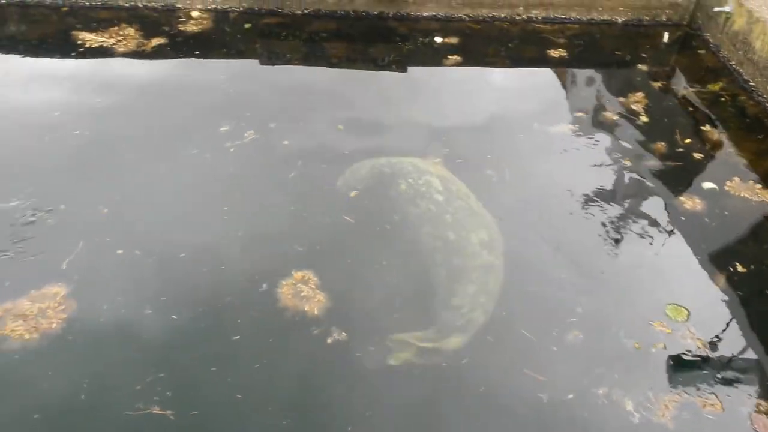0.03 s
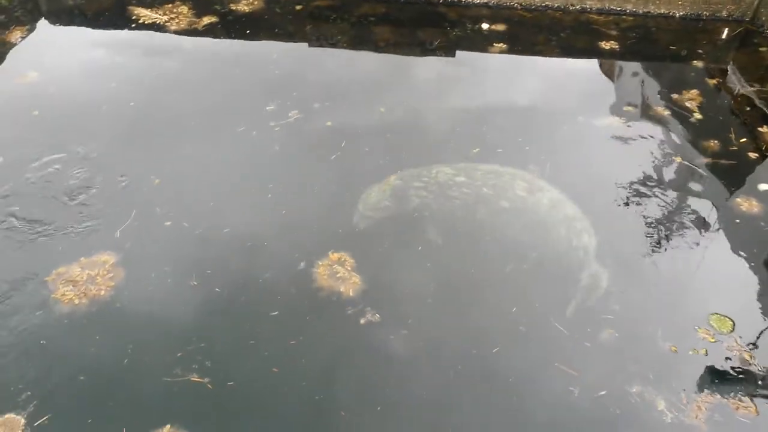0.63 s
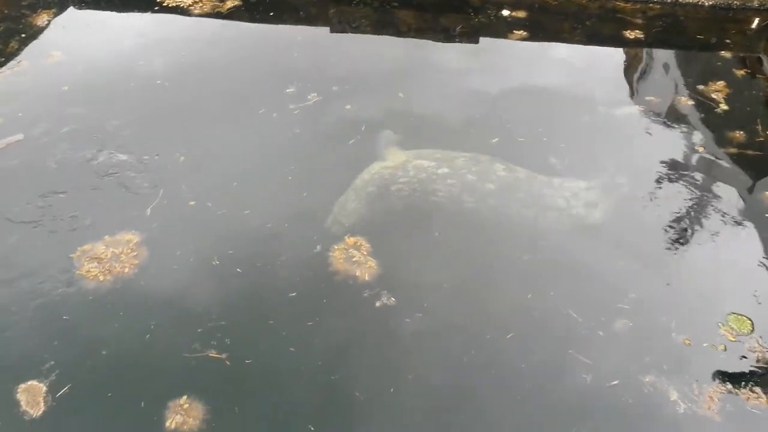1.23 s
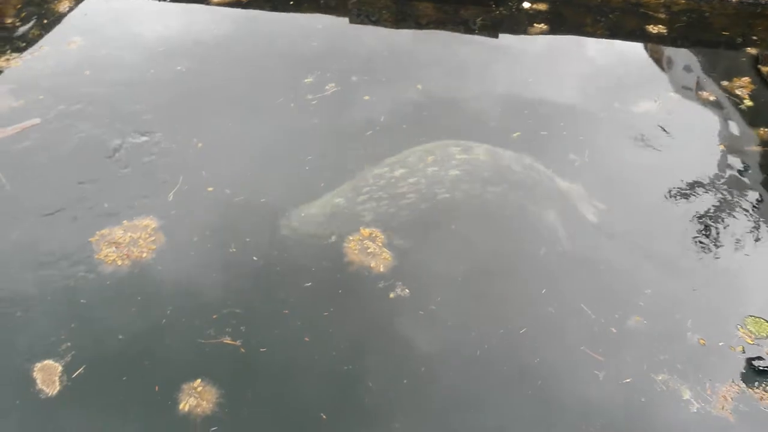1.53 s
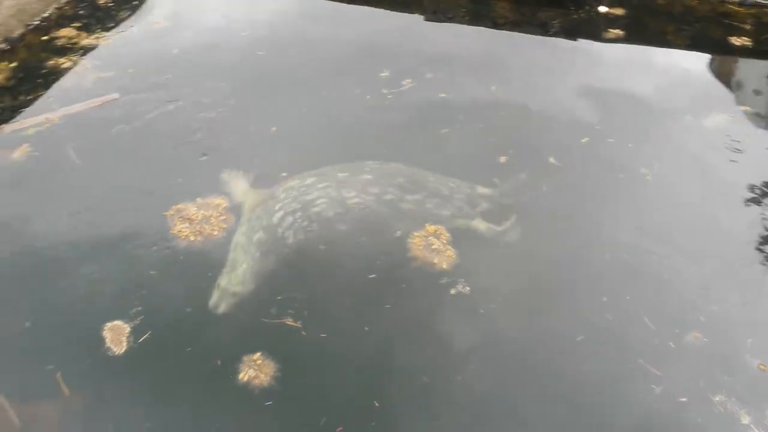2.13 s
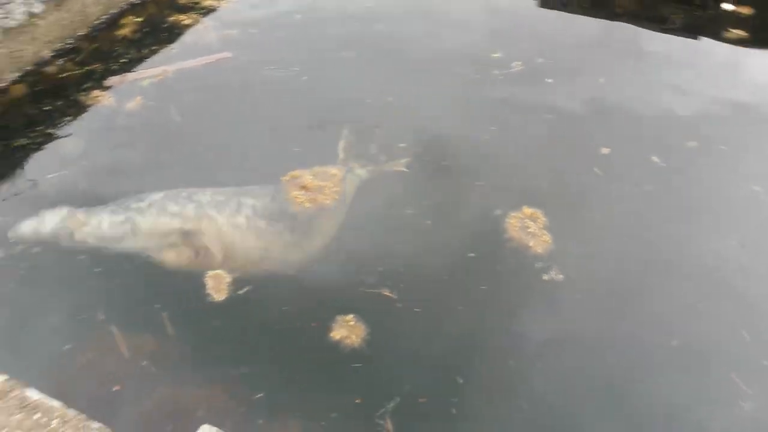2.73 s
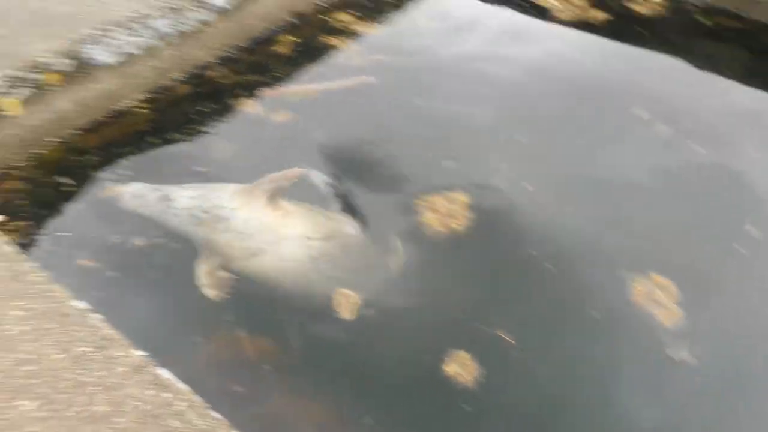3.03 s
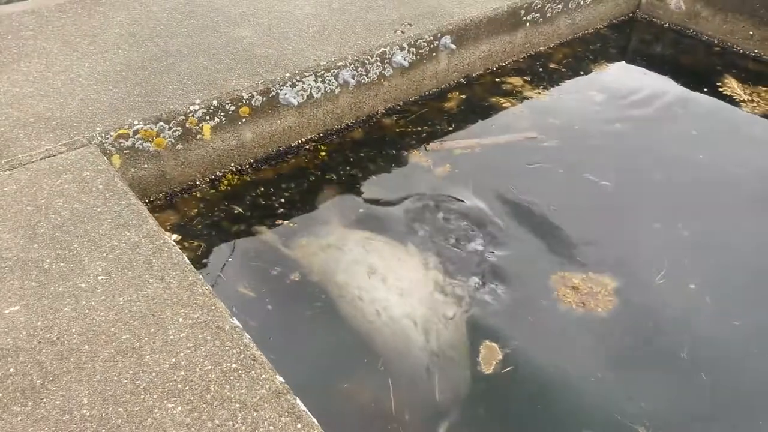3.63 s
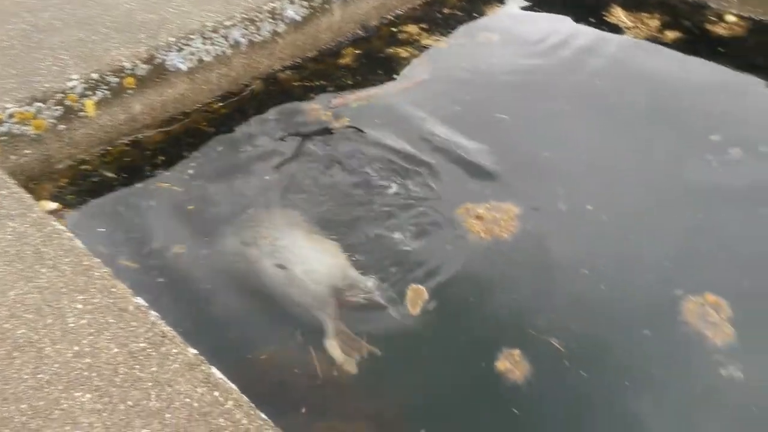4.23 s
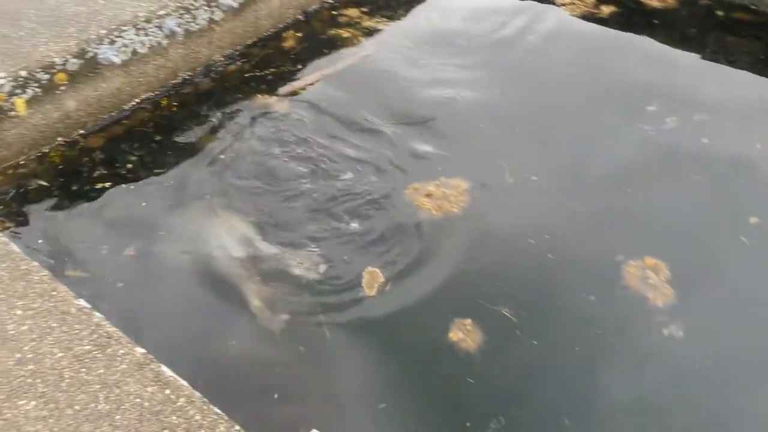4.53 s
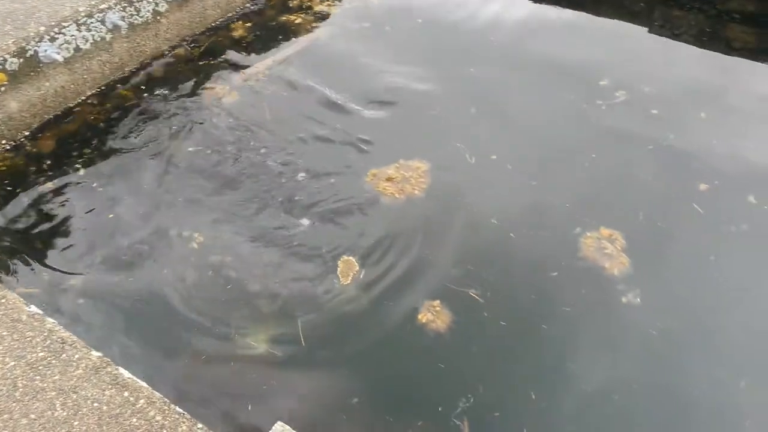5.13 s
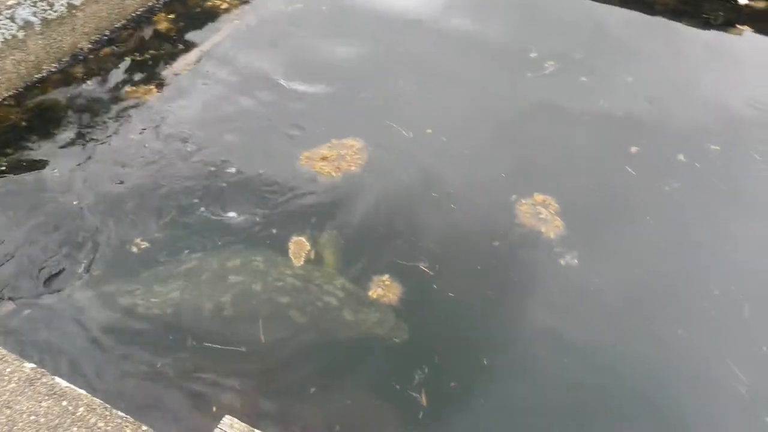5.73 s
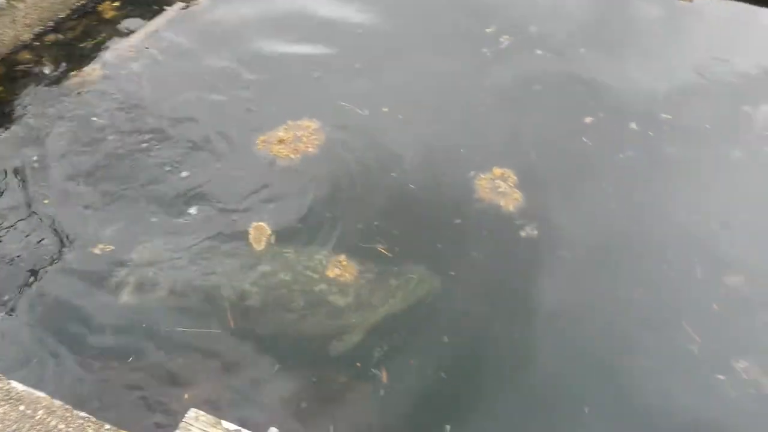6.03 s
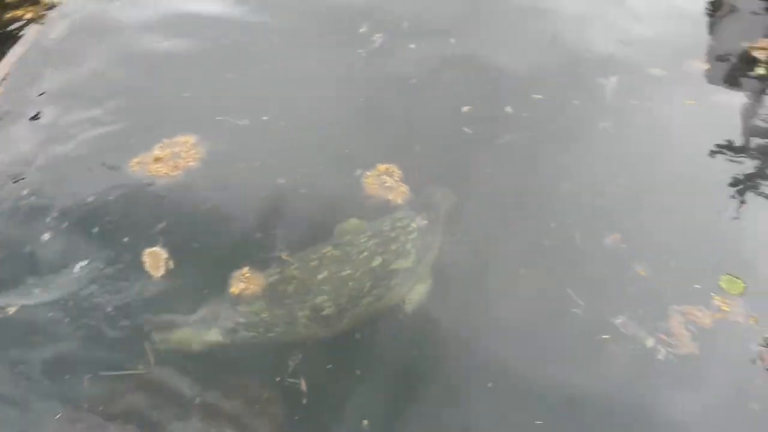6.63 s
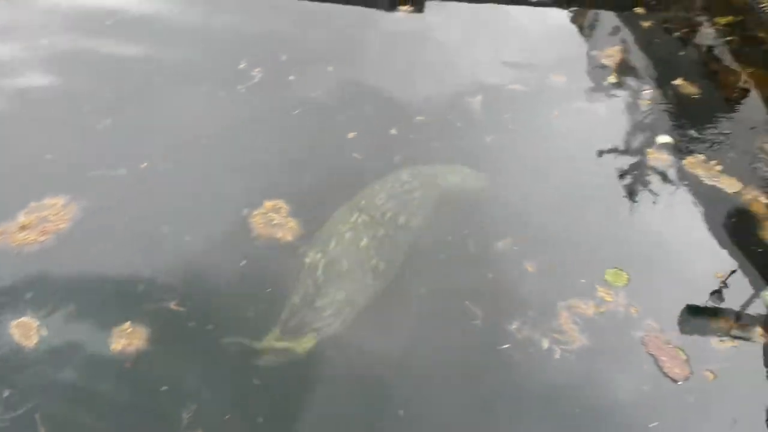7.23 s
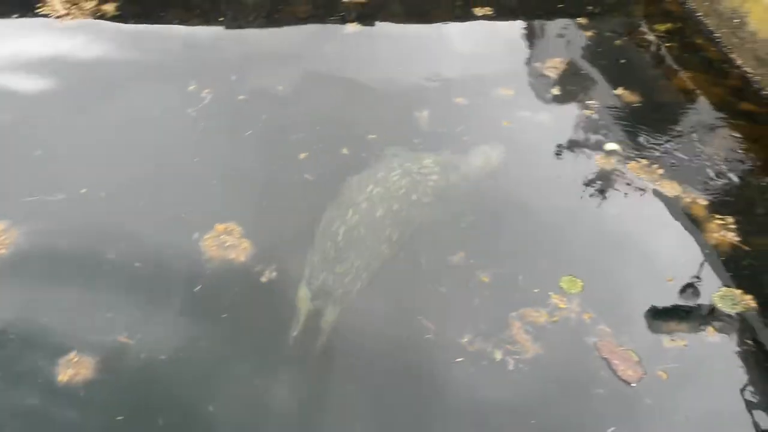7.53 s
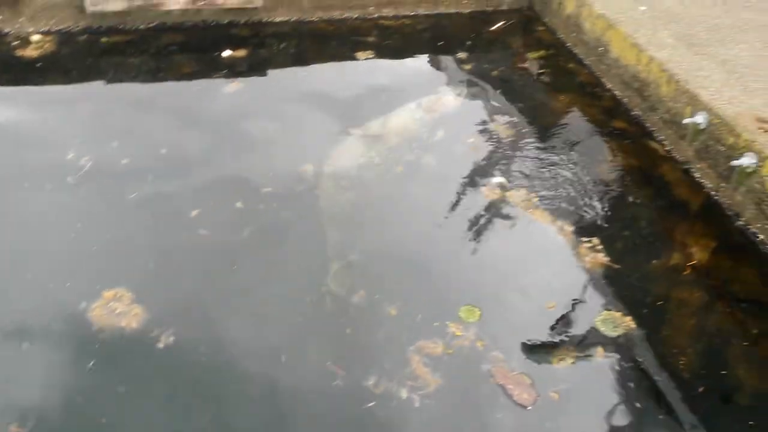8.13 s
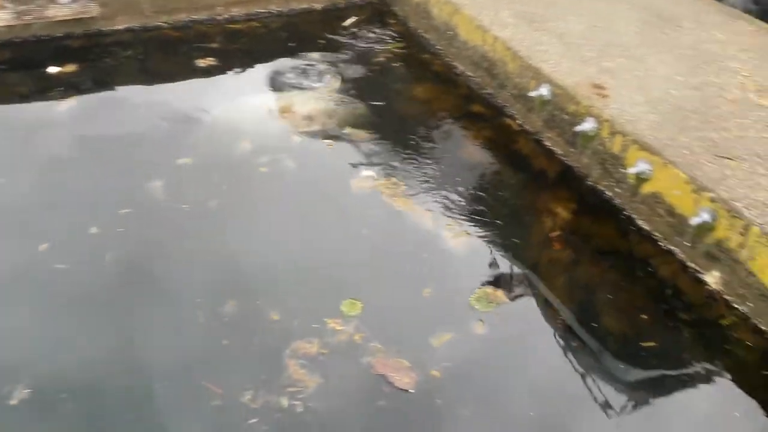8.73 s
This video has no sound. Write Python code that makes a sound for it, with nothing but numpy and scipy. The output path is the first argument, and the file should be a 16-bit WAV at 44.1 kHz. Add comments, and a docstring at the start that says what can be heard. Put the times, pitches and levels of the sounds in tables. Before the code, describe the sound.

At a concrete harbour pool, a low, pulsing rumble of two diesel engines runs steadily, slightly to the right. Beneath it a seal stirs the water, then rolls at the surface with a brief gurgle, light splashes and plinking drops, and swirls again toward the end. Close to the hand-held microphone are small irregular ticks, a faint high hiss and whine, and occasional soft bumps.

```python
"""A concrete harbour pool: a seal rolls at the surface, stirring up bubbles, slaps and drips,
and the walls echo them. Two diesel engines drone nearby at almost the same speed, so their
low orders beat over a diffuse machine wash. A hand-held camera adds a few knocks, a thin whine
and the fizz and spring pings of its lens stabiliser."""
import sys
import numpy as np
from scipy import signal
from scipy.fft import rfft, irfft, next_fast_len
from scipy.io import wavfile
from scipy.ndimage import uniform_filter1d, map_coordinates

SR = 44100
rng = np.random.default_rng(int(sys.argv[2]) if len(sys.argv) > 2 else 0)


def to_wav(s):
    """Save 16-bit WAV."""
    ch = np.atleast_2d(s).T  # columns
    pcm = np.round(np.clip(ch, -1, 1) * 32767)  # PCM
    wavfile.write(sys.argv[1], SR, pcm.astype(np.int16))


N = 392049
TIME_S = np.arange(N) / SR


def amp(db):
    """Decibels to gain."""
    return 10 ** (np.asarray(db) / 20)


def unit(x):
    """x at rms 1."""
    return x / np.sqrt(np.mean(x ** 2) + 1e-20)


def along(points, hz):
    """Interpolate (freq_hz, value) rows on a log axis."""
    freq_hz, values = np.transpose(points)
    return np.interp(np.log(hz + 1), np.log(freq_hz + 1), values)


def curve(points):
    """Interpolate (time_s, value) rows at every sample."""
    return np.interp(TIME_S, *np.transpose(points))


def wobble(rate_hz):
    """Smooth random curve, rate_hz knots a second."""
    knots = rng.standard_normal(int(N * rate_hz / SR) + 4)
    return map_coordinates(knots, [TIME_S * rate_hz], order=2)


def filtered(x, response):
    """x through a frequency response."""
    size = next_fast_len(N + SR // 2)
    return irfft(rfft(x, size) * response(np.fft.rfftfreq(size, 1 / SR)), size)[..., :N]


def noise(spectrum):
    """Noise from (freq_hz, density_db) rows."""
    return filtered(rng.standard_normal(N), lambda hz: amp(along(spectrum, hz)) * np.sqrt(SR / 2))


def band(x, centre_hz, width_hz):
    """x twice through one resonance."""
    b, a = signal.iirpeak(min(centre_hz, SR / 4), centre_hz / width_hz, SR)
    return signal.lfilter(b, a, signal.lfilter(b, a, x))


def tone(turns, rms_db):
    """Sine from a phase in turns."""
    return np.sqrt(2) * amp(rms_db) * np.sin(2 * np.pi * turns)


def add(track, start_s, sound):
    """Mix a sound into the track."""
    part = track[..., max(round(start_s * SR), 0):][..., :sound.shape[-1]]
    part += sound[..., :part.shape[-1]]


def to_right(x, lead_db):
    """Pan right, keeping the mean of both sides."""
    gains = amp([[-lead_db / 2], [lead_db / 2]])
    return x * gains / gains.mean()


# Camera's turn toward the near wall: time_s, share
WALL_FACING = [(0, 0.18), (2.2, 0.17), (2.75, 0.33), (3.15, 0.66), (3.9, 0.66), (4.6, .66), (5.3, 0.53),
               (5.9, 0.43), (6.5, 0.17), (8.89, 0.25)]
# Machine wash: freq_hz, density_db
AIR_SPECTRUM = [(300, -86), (700, -85), (1100, -82.5), (1400, -88), (1800, -87.5), (2500, -92), (3300, -94),
                (4500, -96), (7000, -99), (14000, -103)]

def harbour_air():
    """Diffuse machine wash; a soft whistle grows when facing the wall."""
    wash = np.array([noise(AIR_SPECTRUM), noise(AIR_SPECTRUM)]) * amp(wobble(3.11))
    whistle = unit(band(rng.standard_normal((2, N)), centre_hz=2120, width_hz=250))
    return wash + amp(-66 + 11.8 * curve(WALL_FACING)) * whistle


# Exhausts in step: crest_s, level_db
THROB_CRESTS = [(0, -30.5), (.44, -29), (1.15, -31), (1.92, -27.5), (2.6, -31), (3.34, -27.5), (4.2, -30),
                (4.78, -29), (5.42, -29.5), (6.22, -33), (6.88, -29), (7.55, -29.5), (8.2, -29.5),
                (8.78, -29)]

def exhaust_throb(cycles, order=8, first_share=0.39):
    """Both exhausts at the firing order; the second gains one firing per swell."""
    firing = order * cycles + rng.random()
    gained = np.interp(TIME_S, np.transpose(THROB_CRESTS)[0], np.arange(len(THROB_CRESTS)))
    level_db = curve(THROB_CRESTS)
    return first_share * tone(firing, level_db) + (1 - first_share) * tone(firing + gained, level_db)


CYCLE_HZ = (14.911, 15.0855)  # four-stroke cycle rate of each engine
# Orders both engines sound: order, first_db, second_db, in_step_s
BEAT_ORDERS = [(4, -48, -37, 0.67), (7, -39.5, -46, 0.12)]
# First engine's 12th order: time_s, level_db
BOOM_LEVEL = [(0, -42.5), (2.6, -44), (3.8, -49), (5.2, -43), (6.3, -44), (7.3, -42.5), (8.05, -40),
              (8.89, -41)]

def beating_orders(cycles, sway_db=1.3):
    """Shared orders swell and sink as the second shaft slips ahead of the first."""
    def second(in_step_s):
        return cycles + (CYCLE_HZ[1] - CYCLE_HZ[0]) * (TIME_S - in_step_s)

    boom_db = curve(BOOM_LEVEL)
    out = tone(12 * cycles, boom_db) + 0.35 * tone(12 * second(in_step_s=0.34), boom_db)
    for order, first_db, second_db, in_step_s in BEAT_ORDERS:
        phase = rng.random()
        pair = tone(order * cycles + phase, first_db) + tone(order * second(in_step_s) + phase, second_db)
        out += pair * amp(sway_db * wobble(4))
    return out


# First engine's steady orders: order, level_db
HUM_ORDERS = [(9, -54), (11, -54), (14, -54), (16, -61.5), (17, -62), (18, -58), (20, -52), (23, -55),
              (28, -58.5), (108, -89), (112, -76), (116, -69), (125, -84), (133, -91), (136, -85.5),
              (140, -71.5)]
# Exhaust rumble: freq_hz, density_db
RUMBLE_SPECTRUM = [(15, -79), (30, -83), (45, -69.5), (80, -62), (115, -53), (150, -60.5), (195, -60),
                   (230, -66.5), (320, -67.5), (450, -79.5), (800, -79), (1300, -106.5), (3000, -115)]

def engine_hum(cycles):
    """Orders over exhaust rumble; the resonant 24th and the low mids sink when facing the wall."""
    facing = curve(WALL_FACING)
    drone = tone(24 * cycles, -37.5 - 10 * facing)
    hum = sum(tone(order * cycles + rng.random(), db + 2 * wobble(3.014)) for order, db in HUM_ORDERS)
    hum += noise(RUMBLE_SPECTRUM) * amp(1.55 * wobble(8.4))
    low_mids = filtered(hum, lambda hz: np.exp(-((hz - 240) / 125) ** 2))
    shade_db = -2.5 * (facing - facing.mean())
    return drone + hum + low_mids * (amp(shade_db) - 1)


def engines(speed_drift=0.00038):
    """Two slightly unsteady diesels, standing to the right, so that side leads in phase."""
    cycles = np.cumsum(CYCLE_HZ[0] * (1 + speed_drift * wobble(2.042))) / SR
    sound = exhaust_throb(cycles) + beating_orders(cycles) + engine_hum(cycles)
    return filtered(sound, lambda hz: np.exp(1j * np.tanh(hz / 190) * np.array([[-0.29], [0.29]])))


# Fizz colour facing open water: freq_hz, gain_db
OPEN_COLOUR = [(1500, -11), (3000, -6), (4300, -5.5), (5200, -3), (5950, -2.5), (6550, -15), (7300, -1.5),
               (7800, 1.5), (8650, -9), (9500, 4), (10200, 3), (11200, -1.5), (12500, -4.5), (14500, -11.5)]
# Fizz colour facing the wall: freq_hz, gain_db
WALL_COLOUR = [(1500, -12), (3000, -14.5), (4300, -2.5), (5900, -10.5), (7000, -3.5), (8000, -1.5),
               (9700, 1), (11300, -1), (12500, -6), (14500, -14)]

def actuator_fizz(open_facing=0.24, slide=0.2, patchy_db=2.5):
    """Patchy hiss; its peaks slide up as the camera turns, then blur near the wall."""
    hz, frame_s, spectrum = signal.stft(rng.standard_normal(N), SR, nperseg=512)
    facing = np.interp(frame_s, TIME_S, curve(WALL_FACING))
    shift = 1 + slide * (facing - open_facing)
    near = np.clip((facing - 0.44) / 0.27, 0, 1)
    colour_db = (1 - near) * along(OPEN_COLOUR, hz[:, None] / shift)
    colour_db += near * along(WALL_COLOUR, hz[:, None])
    patches = uniform_filter1d(rng.standard_normal(spectrum.shape), size=8, axis=0)
    patches = unit(uniform_filter1d(patches, size=5, axis=1))
    return unit(signal.istft(spectrum * amp(colour_db + patchy_db * patches), SR, nperseg=512)[1][:N])


def twitches(count):
    """Small lens moves at loosely even intervals, as rows like LENS_JERKS."""
    start_s = (np.arange(count) + rng.random(count)) / count * (N / SR - 0.5)
    usual, spread = [-45.5, 987, -49], [0.6, 44, 0.6]  # ping_db, pitch_hz, fizz_db
    return list(np.column_stack([start_s, rng.normal(usual, spread, (count, 3))]))


# Idling actuator, relative level: time_s, level_db
IDLE_FIZZ = [(0, -53), (.9, -54), (1.3, -52.5), (2.0, -51), (2.7, -54), (3.4, -51), (3.9, -53.5),
             (4.2, -50.5), (4.8, -54.5), (5.3, -55.5), (5.7, -51.5), (6.3, -52.5), (7.1, -54), (7.9, -51.5),
             (8.89, -55.5)]
# Strong jerks, relative levels: start_s, ping_db, pitch_hz, fizz_db
LENS_JERKS = [(0.706, -30.5, 1020, -38.5), (.77, -36, 940, -60), (1.1, -31, 960, -51),
              (1.238, -39, 1070, -42), (1.272, -35, 995, -48), (1.599, -34.5, 1093, -43),
              (1.869, -27, 982, -47), (1.889, -29, 1000, -46), (2.03, -32, 973, -44),
              (2.244, -26, 956, -54), (2.385, -32, 966, -46), (2.601, -27, 937, -49),
              (4.845, -39, 907, -59), (5.304, -33, 1074, -59), (5.664, -35, 960, -48),
              (5.981, -38, 970, -59), (6.249, -39, 973, -42), (6.305, -33, 980, -47),
              (6.642, -35, 957, -52), (7.24, -32, 978, -56), (7.621, -41, 1033, -44),
              (7.686, -35, 967, -56), (7.721, -31.5, 970, -51), (7.963, -33.5, 935, -46)]

def stabiliser(attack_s=0.0021, t60_s=0.08, whine_hz=12113):
    """The lens actuator fizzes by the right microphone, over a whine; each jerk pings its spring."""
    hiss = actuator_fizz()
    pings, rasps, t = np.zeros(N), np.zeros(N), np.arange(SR // 6) / SR
    envelope = (1 - np.exp(-t / attack_s)) * amp(-60 * t / t60_s)
    envelope /= envelope.max()
    waver_rad = 0.8 * wobble(170)  # the spring is shaken unevenly
    for start_s, ping_db, pitch_hz, fizz_db in LENS_JERKS + twitches(count=44):
        phase = 2 * np.pi * pitch_hz * t + waver_rad[round(start_s * SR):][:len(t)]
        add(pings, start_s, amp(ping_db - 5) * envelope * np.sin(phase))
        add(rasps, start_s, amp(fizz_db - 1) * envelope)
    tremor = wobble(45)  # hand shake keeps the actuator busy
    idle = amp(curve(IDLE_FIZZ) + 0.5 + 2.32 * tremor)
    fizz = np.hypot(idle, rasps) * unit(hiss * amp(0.8 * wobble(900)))
    spring = amp(-57 + 4.6 * tremor) * unit(band(rng.standard_normal(N), centre_hz=990, width_hz=230))
    spring += pings * amp(0.78 * wobble(150))
    whine = amp(-61) * np.sin(2 * np.pi * whine_hz * TIME_S)
    rocking = np.array([[-0.45], [2.3]])  # the case rocks, pushing the microphones opposite ways
    return to_right(fizz + whine, lead_db=50) + rocking * spring


# Camera body modes: freq_hz, level_db, t60_s
BODY_MODES = [(290, -5, 0.032), (410, 8.5, 0.0095), (461, -9, 0.15), (540, -11.5, 0.1), (616, -12, 0.13),
              (940, -13, 0.046), (1130, -23, 0.039)]
# Bumps on the body: start_s, level_db
BODY_KNOCKS = [(0.870, -20.5), (3.482, -22), (3.773, -27.5), (7.456, -10.5), (7.510, -25)]

def knocks(cutoff_hz=1300):
    """Soft bumps ring the camera body briefly and dully."""
    out, t = np.zeros(N), np.arange(SR // 5) / SR
    ring = sum(amp(db - 60 * t / t60_s) * np.sin(2 * np.pi * hz * t) for hz, db, t60_s in BODY_MODES)
    ring = signal.lfilter(*signal.butter(3, cutoff_hz, fs=SR), ring)
    for start_s, level_db in BODY_KNOCKS:
        add(out, start_s, amp(level_db) * ring / np.abs(ring).max())
    return out


# Pool echo: freq_hz, t60_s
ECHO_DECAY = [(200, 0.32), (2000, 0.2), (10000, 0.018)]

def wall_echo(x):
    """The concrete sides answer with a short, dull tail."""
    hz, t, spectrum = signal.stft(rng.standard_normal((2, SR // 2)), SR, nperseg=256)
    decay = amp(-60 * t / along(ECHO_DECAY, hz)[:, None])
    tail = signal.istft(spectrum * decay, SR, nperseg=256)[1]
    return signal.fftconvolve(x, tail / np.linalg.norm(tail[0]), axes=1)[:, :N]


def bubble(t, hz, t60_cycles, rise):
    """A ringing bubble, its pitch rising as it nears the surface."""
    age = t * hz / t60_cycles
    phase = 2 * np.pi * hz * t * (1 + rise * np.minimum(age, 2) / 2)
    return np.sin(phase) * amp(-60 * age) * (1 - np.exp(-t * hz / 2))


def swirl(centre_hz, log_spread, count):
    """Stirred water: many small bubbles on a soft wash."""
    t = np.arange(round(12 * SR / centre_hz)) / SR
    starts = (rng.random((count, 1)) * N).astype(int)
    level_db = 1.9 * np.minimum(rng.exponential(size=(count, 1)), 3)
    pitch_hz = np.clip(centre_hz * np.exp(log_spread * rng.standard_normal((count, 1))), 300, 9000)
    pan = rng.random((count, 1))
    grains = amp(level_db) * bubble(t, pitch_hz, t60_cycles=21.5, rise=0.35)
    samples = (starts + np.arange(len(t))).ravel()
    bubbles = np.array([np.bincount(samples, (grains * side).ravel(), N)[:N] for side in (pan, 1 - pan)])
    wash = band(rng.standard_normal((2, N)), centre_hz, width_hz=centre_hz)
    return unit(unit(bubbles) + 0.5 * unit(wash))


# Water slaps: start_s, level_db, centre_hz, width_hz, t60_s
WATER_SLAPS = [(0.666, -37, 2200, 2500, 0.083), (.703, -40, 5500, 4000, .12),
               (1.596, -35.5, 5300, 1520, .04), (2.031, -33.5, 1660, 350, .05),
               (3.338, -31, 1500, 2000, .06), (3.374, -27, 790, 500, 0.045), (3.391, -38, 1000, 350, 0.03),
               (3.445, -34, 4300, 1400, 0.074), (3.484, -33, 1400, 2000, 0.018),
               (3.495, -29, 3450, 2500, 0.051), (3.496, -26, 1100, 900, 0.027),
               (3.764, -37, 1900, 1400, .04), (3.853, -38, 1390, 1200, .058),
               (5.237, -35.5, 3870, 2500, .05), (8.085, -35, 595, 200, .08), (8.09, -42, 2300, 600, .13),
               (8.358, -42.5, 2380, 500, .11), (8.78, -33, 3040, 2500, 0.027)]
# Falling drops: start_s, level_db, pitch_hz
WATER_DRIPS = [(.6175, -32, 4600), (3.286, -31, 2020), (3.387, -31, 6000), (3.595, -34, 3200),
               (3.6945, -21, 3450), (3.715, -33, 4140), (4.653, -36, 3840), (4.77, -36, 4700)]

def splashes():
    """Water slaps the seal and the wall; drops fall back and ring as bubbles."""
    out, t = np.zeros((2, N)), np.arange(SR // 8) / SR
    for start_s, level_db, centre_hz, width_hz, t60_s in WATER_SLAPS:
        burst = rng.standard_normal(len(t)) + 1.1 * rng.standard_normal((2, len(t)))
        burst = band(burst * amp(-60 * t / t60_s), centre_hz, width_hz)
        add(out, start_s, amp(level_db + 2) * burst / np.abs(burst).max())
    for start_s, level_db, pitch_hz in WATER_DRIPS:
        add(out, start_s, amp(level_db) * bubble(t, pitch_hz, t60_cycles=37, rise=0.43))
    return out


# Seal's strokes: crest_s, fine_db, deep_db, length_s
SEAL_STROKES = [(0.702, -52, -64, 0.36), (1.32, -64, -70, .5), (2.25, -60, -59, 1.4),
                (3.37, -53, -43, 0.27), (3.505, -48.5, -43, 0.23), (3.653, -50.5, -49, .35),
                (4.25, -59.5, -66, .6), (7.69, -59.5, -54, 1.1), (8.094, -51.5, -51, 0.34),
                (8.394, -53, -57, 0.44), (8.765, -49.5, -50.5, .8)]

def seal_roll(lapping_db=(-68, -61), rise_share=0.76, fade_db=23.5):
    """Each stroke stirs a surge of fine bubbles and deep gurgle over quiet lapping and splashes."""
    power = amp(lapping_db)[:, None] ** 2
    for crest_s, fine_db, deep_db, length_s in SEAL_STROKES:
        lengths_away = np.maximum((crest_s - TIME_S) / rise_share, TIME_S - crest_s) / length_s
        power = power + np.outer(amp([fine_db, deep_db]), amp(-fade_db * lengths_away)) ** 2
    fine, deep = np.sqrt(power)
    bubbles = fine * swirl(centre_hz=3005, log_spread=0.49, count=4000)
    gurgle = deep * swirl(centre_hz=680, log_spread=0.31, count=1500)
    treble = [(4600, -1.5), (5400, -4), (9000, 5)]  # freq_hz, gain_db
    return filtered(bubbles + gurgle + splashes(), lambda hz: amp(along(treble, hz)))


# Right microphone over left: freq_hz, lead_db
RIGHT_BALANCE = [(60, 3), (120, 3.5), (200, 4.5), (370, 6), (700, 7), (1100, -1), (1500, 9), (2300, -1),
                 (4000, 0.5)]

def scene():
    """Seal, harbour and camera noises at two microphones, the right one mostly louder."""
    water = seal_roll()
    echo = amp(-10) * wall_echo(water)
    mix = engines() + harbour_air() + knocks() + water + echo
    balance = lambda hz: amp(np.array([[-0.5], [0.5]]) * along(RIGHT_BALANCE, hz))
    return filtered(mix, balance) + stabiliser()


def record(dry, notch_hz=5300, top_hz=14650):
    """The right microphone port has a notch; the camera cuts everything above top_hz."""
    port = lambda hz: amp(np.array([[0], [-9]]) * np.exp(-((hz - notch_hz) / 450) ** 2))
    return filtered(dry, lambda hz: port(hz) * (hz < top_hz))


dry = scene()
out = record(dry)
to_wav(out)
```